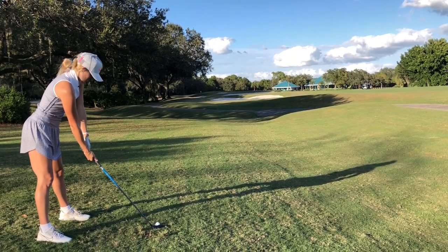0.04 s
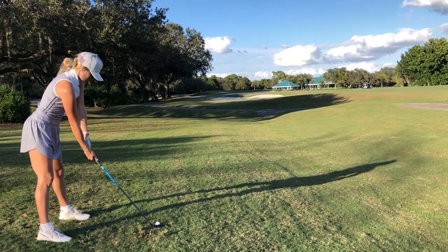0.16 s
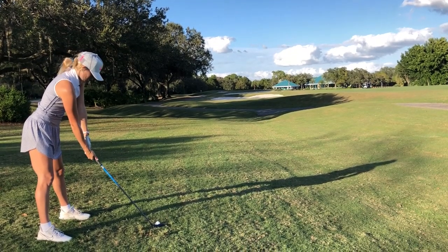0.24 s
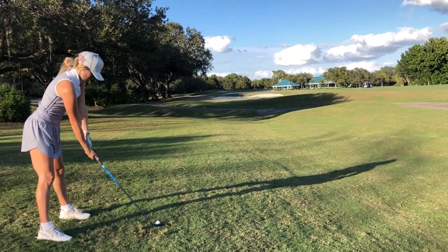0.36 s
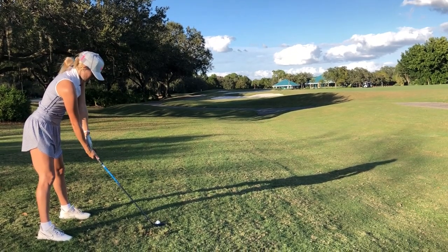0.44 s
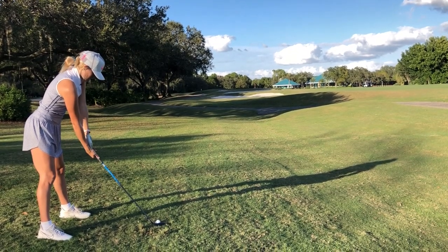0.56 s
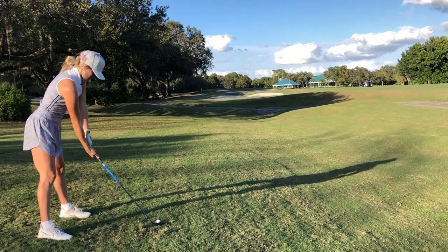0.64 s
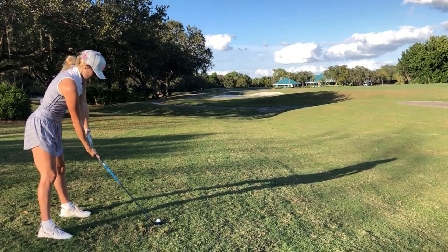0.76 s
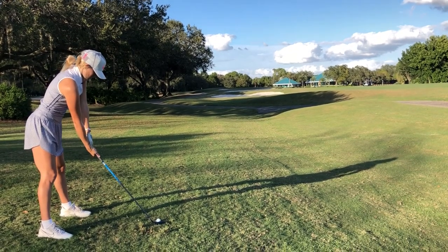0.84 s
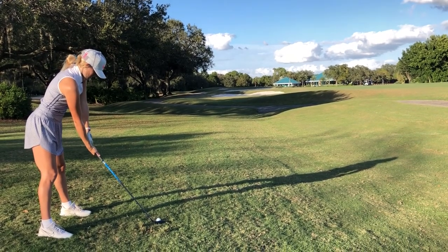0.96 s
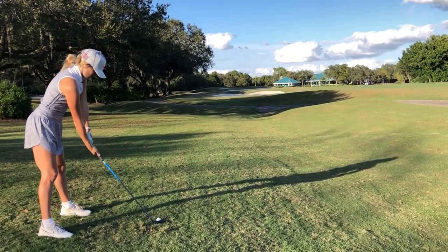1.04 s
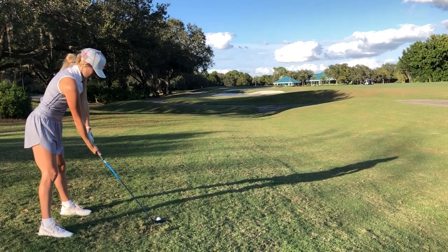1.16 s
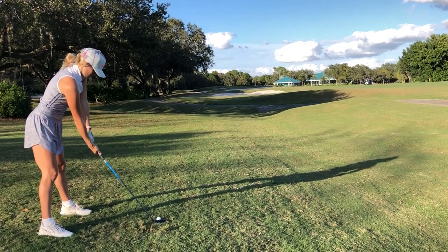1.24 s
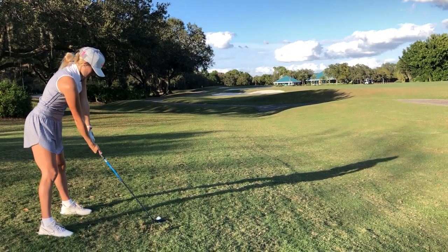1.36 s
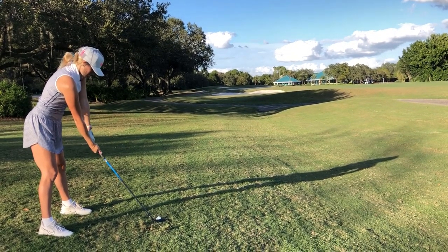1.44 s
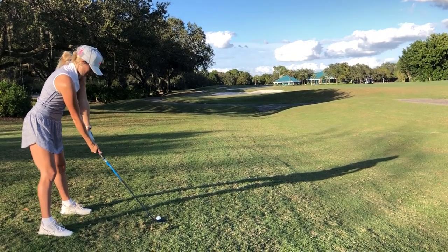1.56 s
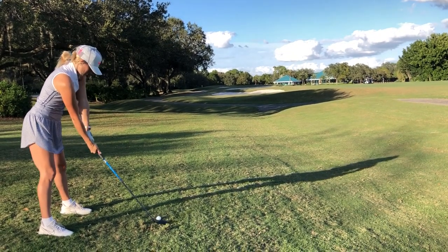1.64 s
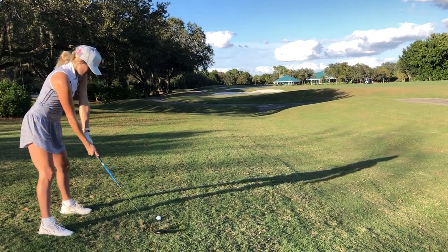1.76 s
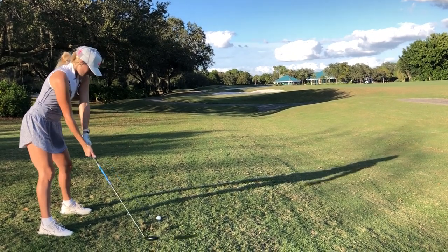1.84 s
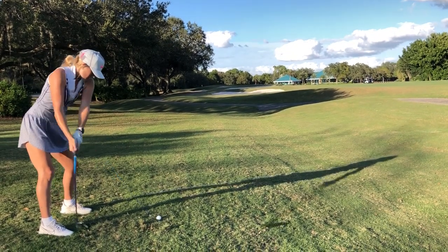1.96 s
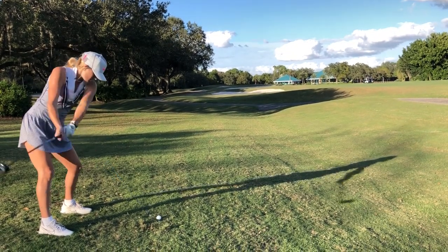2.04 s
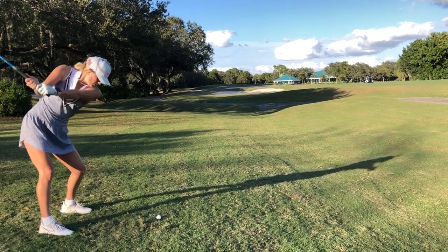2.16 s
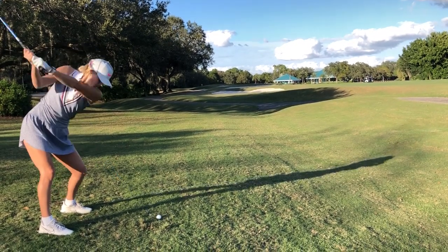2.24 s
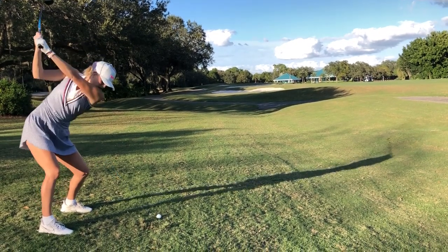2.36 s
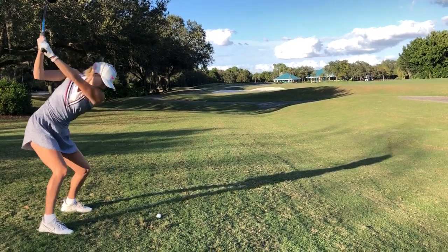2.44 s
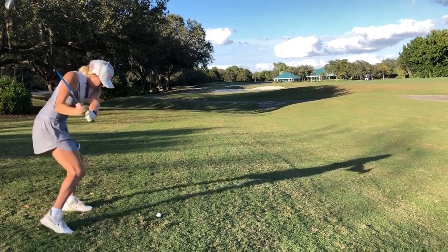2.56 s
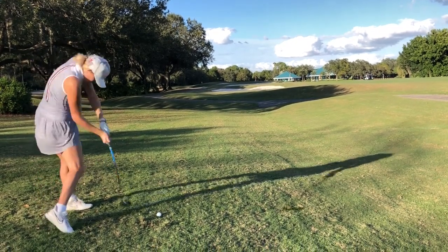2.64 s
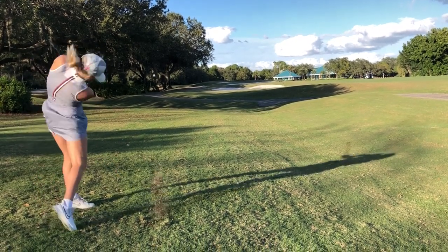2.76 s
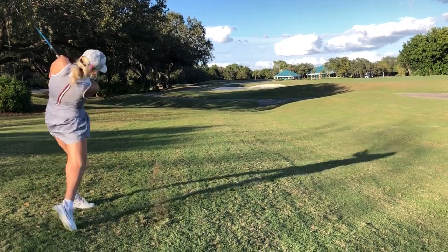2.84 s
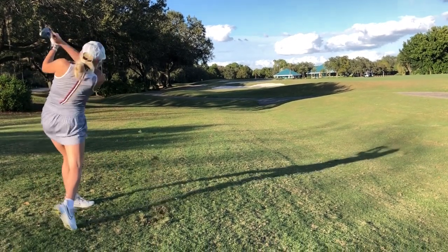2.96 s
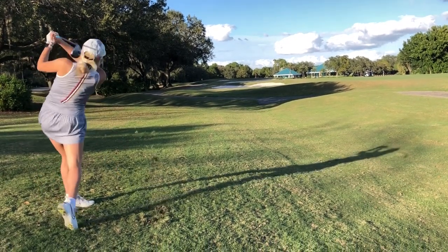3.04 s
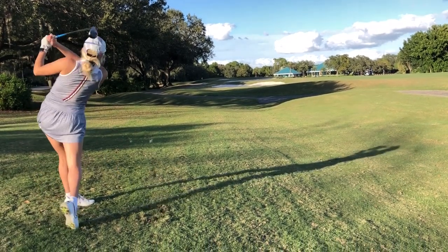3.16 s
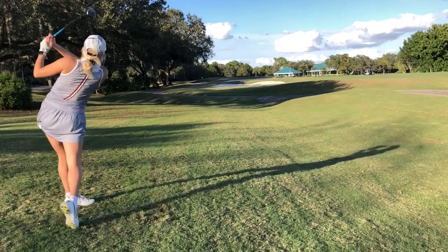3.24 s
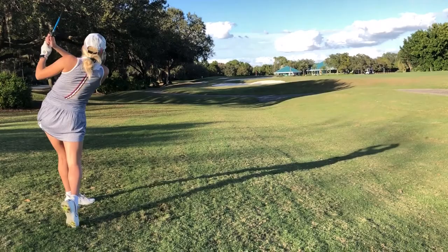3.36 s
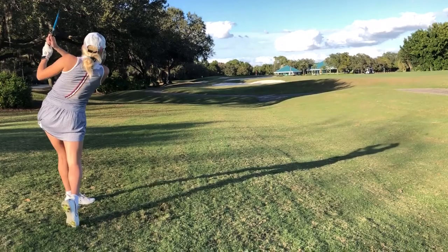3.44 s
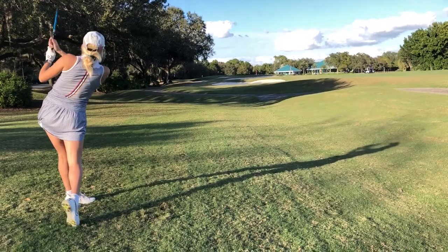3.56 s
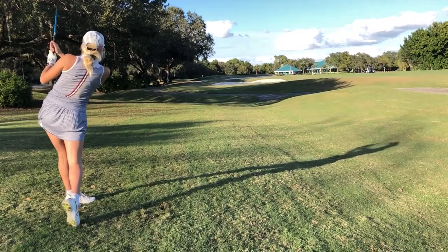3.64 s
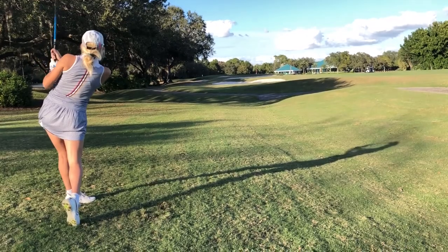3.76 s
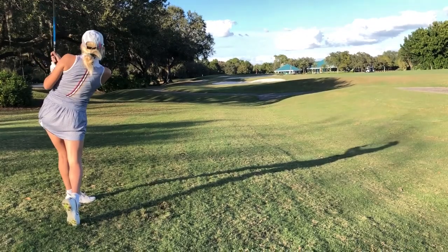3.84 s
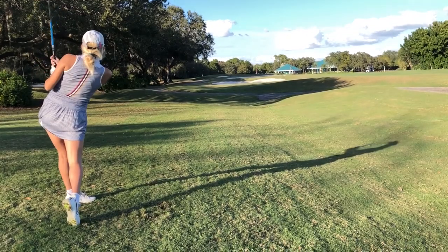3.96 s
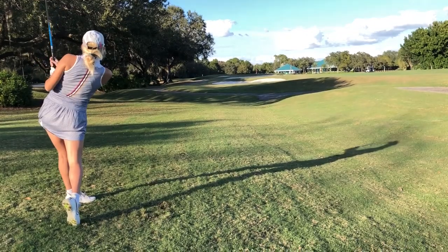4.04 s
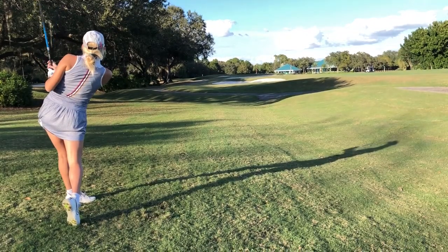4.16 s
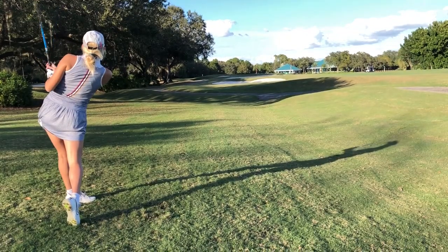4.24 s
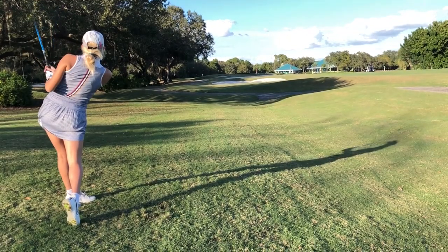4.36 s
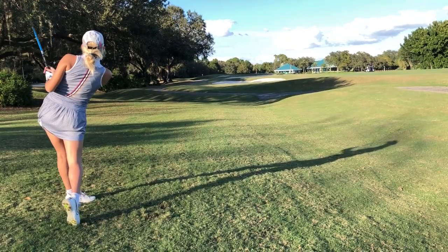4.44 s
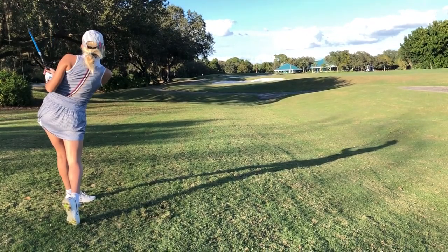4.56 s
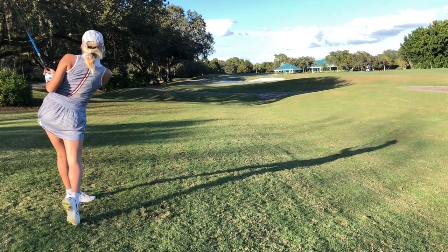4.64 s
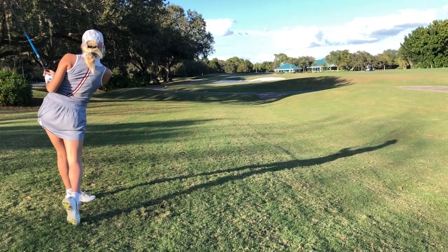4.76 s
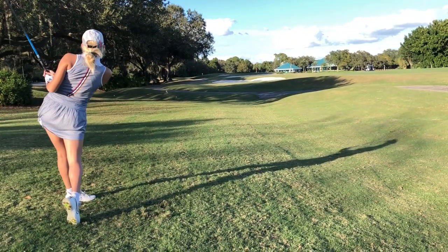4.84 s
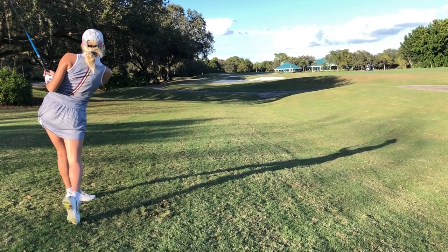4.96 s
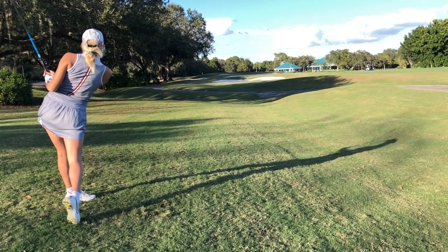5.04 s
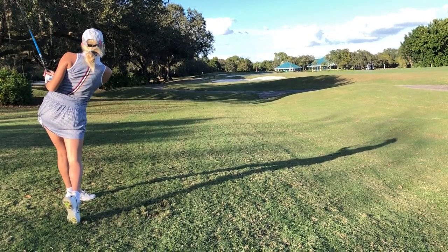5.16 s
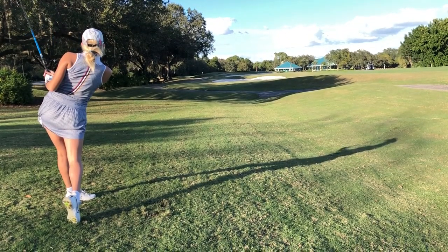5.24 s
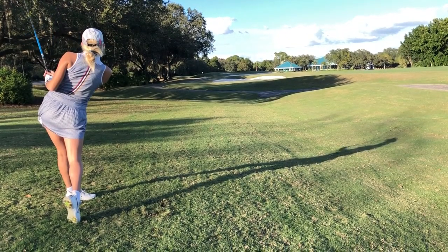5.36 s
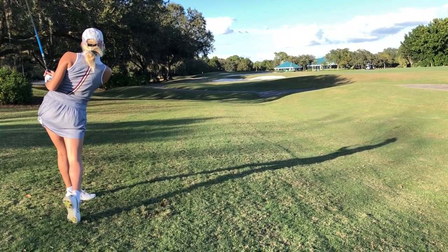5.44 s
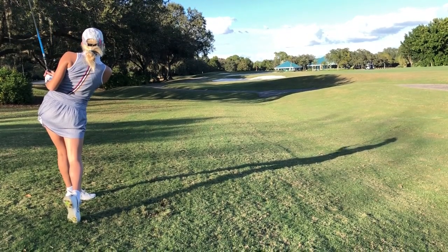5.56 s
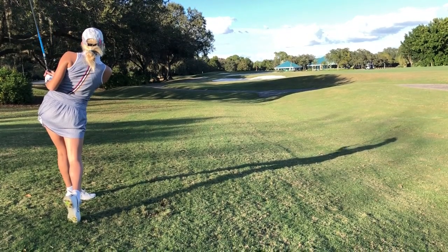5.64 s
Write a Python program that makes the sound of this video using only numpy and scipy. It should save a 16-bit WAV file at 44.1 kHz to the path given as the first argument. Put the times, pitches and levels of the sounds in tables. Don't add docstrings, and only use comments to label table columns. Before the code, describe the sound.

Faint outdoor hum and insects, a short swish into a hard clipped golf strike, followed by a loud dry crack and fainter distant ones.

```python
import sys
import numpy as np
from scipy import signal
from scipy.fft import rfft, irfft, next_fast_len
from scipy.io import wavfile
from scipy.ndimage import map_coordinates

SR = 44100
rng = np.random.default_rng(int(sys.argv[2]) if len(sys.argv) > 2 else 0)


def attenuation_scalar(level_db):
    decades = np.asarray(level_db, float) / 20
    return 10 ** decades


def file_out(sig):
    cols = np.atleast_2d(sig).T
    lim = np.clip(cols, -1, 1)
    pcm = np.round(lim * 32767).astype(np.int16)
    wavfile.write(sys.argv[1], SR, pcm)


N = 251805
T = np.arange(N) / SR

# pitch_hz, width_hz, level_db
CICADAS = [(9000, 130, -82), (5420, 520, -77)]
# pitch_hz, level_db
WHINE = (9980, -83)
# pitch_hz, level_db
TRAFFIC_COLOUR = [(15, -70), (25, -36.5), (42, -14.5), (63, -6), (123, -2), (316, -19.5), (352, -18.5),
                  (425, -20.5), (541, -19), (1150, -21), (1680, -33), (4440, -43.5), (5810, -46.5),
                  (6300, -47), (15800, -52)]
TRAFFIC_DB = -43.5

# pitch_hz, level_db, first_chirp_s, period_s, swell_db
CRICKETS = [(5930, -74, .22, .385, 7), (5595, -69, .165, .472, 0.4), (5350, -73, .185, .467, -1.5)]
STROKE_S, PAIR_S = .014, .064
SWELL_S, LOUDEST_S = 5.2, .2

# start_s, attack_s, hold_s, die_away_s, level_db
CHIP = (.8535, .007, .0055, .007, -45)
# start_s, attack_s, hold_s, die_away_s, level_db
CHIP_ECHO = (.864, .004, .003, .07, -59)
ARCH_HZ, ARCH_DROP_HZ, ARCH_TOP_S, ARCH_HALF_S = 5600, 1300, .8628, .0065

# start_s, attack_s, hold_s, die_away_s, level_db
GRASS_STROKES = [
    (1.52, .13, .16, .12, -58.5),
    (2.41, .05, .2, .05, -65),
]
# pitch_hz, level_db
BLADE_COLOUR = [(1760, -35), (3000, -7), (4070, -10), (5530, -4), (7770, -2), (10000, -5), (13500, -2),
                (15800, 4)]

# start_s, peak_db, pitch_hz
TICKS = [(1.908, -50, 5300), (2.15, -58, 5500), (2.34, -56, 4400), (2.398, -51, 5500), (2.559, -49, 6800),
         (2.62, -47, 4500), (3.028, -55, 9000), (3.059, -55, 14500), (3.071, -48, 8000), (3.079, -48, 7200),
         (3.094, -50, 7000), (3.248, -33, 4500), (3.255, -42, 13000), (3.366, -48, 11600),
         (3.56, -60, 11500), (3.63, -60, 8500), (3.868, -55, 12000), (3.929, -43, 4300), (3.93, -52, 8000),
         (3.927, -54, 12500), (3.941, -46, 4300), (3.942, -53, 11500), (3.978, -58, 12600),
         (4.023, -57, 12000), (4.43, -55.5, 5540), (5.037, -54, 9000), (5.042, -53, 9000),
         (5.05, -56.5, 11000), (5.129, -56, 8500)]

# time_s, shedding_hz, level_db
SWISH = [(2.6, 130.5, -63), (2.636, 331, -46), (2.654, 480, -35.5), (2.68, 450, -33), (2.705, 430, -30),
         (2.72, 400, -31.5), (2.738, 170, -32), (2.78, 99, -46), (2.8, 88.2, -56)]
# start_s, attack_s, hold_s, die_away_s, level_db
GUSTS = [
    (2.41, .06, .2, .1, -62.5),
    (2.72, .015, .005, .19, -42),
]
# pitch_hz, level_db
WAKE_COLOUR = [(700, -22), (1500, -2), (2500, -10), (4000, -6), (7000, -7), (15800, -17)]
WAKE_DB, WAKE_GROWS = 27, 2.3

# start_s, attack_s, hold_s, die_away_s, level_db
SQUEAK = (2.423, .01, .235, .06, -60.5)
# pitch_hz, glide_share, level_db, life_s
SQUEAK_PARTIALS = [(2880, 0.55, -4, 0.3), (4560, 0.34, -1, 0.17), (6900, .5, -1, .13), (7500, .4, -5, .1),
                   (10200, .3, -12, .09), (11600, .3, -11, .07)]
SETTLE_HZ, SAG_HZ, SAG_S = 5500, 800, .042
BITE, BITE_S = .2, .0055
SLIP_S, SLIP_WIDE_S, SLIP_DB = 2.505, .016, -9

# start_s, grit_db, face_hz, face_db, contact_s
CONTACTS = [(2.697, -32, 5800, -34, .002), (2.7112, -30.5, 7900, -29.5, .001),
            (2.7140, -15, 6000, -12.5, 0.0038), (2.7167, -12, 7600, -9.5, 0.0015),
            (2.72037, -8, 5900, 9, 0.00108), (2.7236, -15, 8300, -11, 0.0018),
            (2.7314, -21.5, 8370, -19, .003), (2.736, -27, 8370, -23, .002), (2.741, -31, 8370, -26, .003)]
# pitch_hz, level_db
GRIT_COLOUR = [(400, -20.5), (1400, -4.5), (3000, -10.5), (4600, -3.5), (6000, -8), (8300, 1.5), (9200, -7),
               (10300, -4.5), (12500, -2), (15800, -13.5)]
# pitch_hz, level_db, die_away_s
RING = [(8370, -30, 0.11), (5800, -30, .06), (4600, -17, .045)]
# start_s, level_db, pitch_hz
THUDS = [(2.7158, -7.5, 1300), (2.7188, -6, 650), (2.7215, -10, 900), (2.7325, -20, 300), (2.737, -19, 220)]
GRIT_DIE_S, DIG_DIE_PER_S = .016, .4

# start_s, attack_s, hold_s, die_away_s, level_db
LEAF_ECHO = [(2.791, .006, .018, .17, -33.5)]
# start_s, attack_s, hold_s, die_away_s, level_db
CROWN_ECHO = [
    (2.792, .008, .048, .07, -41),
    (2.8, .05, .15, 1.5, -50.5),
]
# pitch_hz, level_db
LEAF_COLOUR = [(530, -44.5), (900, -14), (1130, -15), (1400, -4.5), (2060, -13.5), (2980, -6), (3790, -11),
               (4930, 0.5), (5630, -10.5), (6740, 0.5), (8980, -14.5), (10700, -8.5), (15800, -23.5)]
# pitch_hz, width_hz, level_db
CROWN_BANDS = [(2750, 560, -9), (4920, 300, 0), (6300, 310, 0)]

# start_s, attack_s, hold_s, die_away_s,
# level_db
RUSTLE = [(2.8, .04, .02, .9, -53), (3.15, .03, .09, .8, -49.5), (4.505, .02, .04, .6, -60),
          (4.646, .004, .02, .3, -61)]
# pitch_hz, level_db
FOLIAGE_COLOUR = [(900, -20), (1500, -2), (2500, -4), (5700, -6), (9400, -13), (11500, -11), (15800, -16)]

# start_s, peak_db, pitch_ratio, splinter_db, scatter_db
NEAR_CRACKS = [(3.1053, -35.5, 3.7, 14, -11.5), (3.133, -18, 1.04, -6, -13.5),
               (3.14678, -2, 1.06, -15, -24.5), (3.14797, -11, 1.06, -7, -29.5),
               (3.1522, -17, 1.2, -11.5, -16), (3.19, -30, 0.98, 0, -14), (3.2122, -22, 1.08, -6, -16)]
# start_s, peak_db, pitch_ratio
FAR_CRACKS = [(4.502, -33, 1.06), (4.505, -28, 1.15), (4.5164, -24.5, 1.15), (4.571, -40, 1.15),
              (4.6455, -30.5, 1.62)]
FAR_SPLINTER_DB, FAR_SCATTER_DB = -14, -13.5
NEAR_KHZ, FAR_KHZ = 32, 6.5
# pitch_hz, width_hz, level_db
WOOD_MODES = [(1300, 360, -23), (3175, 290, 4), (3760, 400, -3.5), (4640, 500, -4), (7800, 900, -12)]
# pitch_hz, level_db
SPLINTER_COLOUR = [(150, -14), (600, -6.5), (1500, -6.5), (4000, -5), (8000, -5), (9800, -9), (12000, -2.5),
                   (15800, -12)]

# start_s, attack_s, hold_s, die_away_s, level_db
GROVE_ECHO = [(3.148, .008, .02, .4, -40), (3.27, .08, .01, .3, -50), (3.39, .04, .02, .5, -57),
              (3.6, .04, .01, .3, -66), (4.51, .015, .02, .45, -53)]
# pitch_hz, width_hz, level_db
HOLLOW_BANDS = [(4050, 600, 0), (3223, 460, -6.5), (5237, 1500, -7)]


def unit(x):
    return x / np.sqrt(np.mean(x ** 2) + 1e-20)


def curves(rows):
    s, *columns = np.transpose(rows)
    gate = (T > s[0]) & (T < s[-1])
    return [np.interp(T, s, column) for column in columns] + [gate]


def filtered(x, response):
    size = next_fast_len(len(x) + 8192)
    spectrum = rfft(x, size) * response(np.fft.rfftfreq(size, 1 / SR))
    return irfft(spectrum, size)[:len(x)]


def colour(points):
    f, db = np.transpose(points)
    return lambda hz: attenuation_scalar(np.interp(np.log(hz + 1), np.log(f + 1), db))


def modes(peaks, base_db=-120):
    def response(f):
        total = 0
        for k, (centre, width, db) in enumerate(peaks):
            resonance = 1j * f * width / (centre * centre - f * f + 1j * f * width)
            total = total + (-1) ** k * attenuation_scalar(db) * resonance
        return attenuation_scalar(base_db) + total
    return response


def noise(response, size=N):
    return unit(filtered(rng.standard_normal(size), response))


def wobble(rate):
    knots = rng.standard_normal(int(N * rate / SR) + 4)
    return map_coordinates(knots, [T * rate])


def add(track, s, x):
    track[round(s * SR):][:len(x)] += x


def fade(t60, size):
    return attenuation_scalar(-60 * np.arange(size) / SR / t60)


def swell(s, attack, hold, t60, db):
    rise = np.clip((T - s) / attack, 0, 1) ** 2
    return rise * attenuation_scalar(db - 60 * np.clip(T - s - attack - hold, 0, None) / t60)


def swells(rows):
    return sum(swell(*row) for row in rows)


def cicadas():
    return sum(attenuation_scalar(db + 1.5 * wobble(4)) * noise(modes([(hz, width, 0)])) for hz, width, db in CICADAS)


def whine():
    hz, db = WHINE
    return attenuation_scalar(db + 3) * np.sin(2 * np.pi * hz * T)


def traffic():
    return attenuation_scalar(TRAFFIC_DB + 0.3953 * wobble(7.3)) * noise(colour(TRAFFIC_COLOUR))


def crickets():
    out = np.zeros(N)
    for hz, db, first, period, swell_db in CRICKETS:
        since = (T - first + period / 2) % period - period / 2
        pairs = np.exp(-(since / STROKE_S) ** 2) + np.exp(-((since - PAIR_S) / STROKE_S) ** 2)
        song_db = swell_db * np.cos(2 * np.pi * (T - LOUDEST_S) / SWELL_S)
        level_db = db + song_db + 1.8 * wobble(4.96) + 2.5 * wobble(120)
        phase = 2 * np.pi * np.cumsum(hz + 25 * wobble(37)) / SR
        out += attenuation_scalar(level_db) * pairs * np.sin(phase)
    return out


def bird():
    hz = ARCH_HZ - ARCH_DROP_HZ * np.clip((T - ARCH_TOP_S) / ARCH_HALF_S, -2, 2) ** 2
    chip = swell(*CHIP) * np.sin(2 * np.pi * np.cumsum(hz) / SR)
    return chip + swell(*CHIP_ECHO) * noise(modes([(5250, 500, 0)]))


def grass():
    return sum(swell(*row) * attenuation_scalar(1.2 * wobble(120)) * noise(colour(BLADE_COLOUR)) for row in GRASS_STROKES)


def ticks():
    out = np.zeros(N)
    for s, db, hz in TICKS:
        click = noise(lambda f: modes([(hz, .4 * hz, 0)])(f) ** 2, size=2000)
        add(out, s, attenuation_scalar(db - 3.5) * fade(0.015, 2000) * click)
    return out


def swish():
    hz, db, gate = curves(SWISH)
    air_gain = gate * attenuation_scalar(WAKE_GROWS * db + WAKE_DB) + swells(GUSTS)
    air = air_gain * attenuation_scalar(1.5 * wobble(150)) * noise(colour(WAKE_COLOUR))
    phase = 2 * np.pi * np.cumsum(hz) / SR
    # pitch_ratio, level_db, wobble_hz
    parts = [(.62, -9, 200), (1, 0, 240), (1.5, -6, 401.5), (2.2, -9.5, 598.3), (3.3, -14, 1203)]
    shed = sum(attenuation_scalar(level) * wobble(rate) * np.sin(ratio * phase) for ratio, level, rate in parts)
    return air + gate * attenuation_scalar(db + 2.5) * shed


def squeak():
    age = np.clip(T - SQUEAK[0], 0, None)
    hz = SETTLE_HZ + SAG_HZ * np.exp(-age / SAG_S)
    bite = 1 - BITE * np.exp(-age / BITE_S)

    def tone(f):
        return np.sin(2 * np.pi * np.cumsum(f * bite + 20 * wobble(150)) / SR)

    overtones = np.zeros(N)
    for centre, glide, level, life in SQUEAK_PARTIALS:
        gain = attenuation_scalar(-3 + level + 1.9 * wobble(60)) * np.exp(-(age / life) ** 4)
        overtones += gain * tone(centre * (hz / 5800) ** glide)
    slip_db = SLIP_DB * np.exp(-((T - SLIP_S) / SLIP_WIDE_S) ** 2)
    main = attenuation_scalar(slip_db + 1.4 * wobble(80)) * tone(hz)
    return swell(*SQUEAK) * (main + overtones)


def strike():
    out = np.zeros(N)
    t = np.arange(4410) / SR
    for s, db, hz, mode_db, contact in CONTACTS:
        t60 = GRIT_DIE_S + DIG_DIE_PER_S * (s - CONTACTS[0][0])
        grit = attenuation_scalar(db) * fade(t60, len(t)) * noise(colour(GRIT_COLOUR), size=len(t))
        ping = attenuation_scalar(mode_db) * np.exp(-(t / contact) ** 3) * np.sin(2 * np.pi * hz * t)
        add(out, s, (grit + ping) * (1 - np.exp(-t / 0.00018)))
    for s, db, hz in THUDS:
        thud = -attenuation_scalar(db) * np.sin(2 * np.pi * hz * t) * np.exp(-1.2 * hz * t)
        add(out, s - 0.23 / hz, thud)
    for hz, db, t60 in RING:
        gain = attenuation_scalar(db + 3 * wobble(250)[:len(t)]) * fade(t60, len(t))
        add(out, 2.7215, gain * np.sin(2 * np.pi * hz * t))
    return out


def oaks():
    near = swells(LEAF_ECHO) * attenuation_scalar(2.2 * wobble(150)) * noise(colour(LEAF_COLOUR))
    far = swells(CROWN_ECHO) * attenuation_scalar(1.7 * wobble(60)) * noise(modes(CROWN_BANDS, base_db=-24.5))
    return near + far


def rustle():
    return swells(RUSTLE) * attenuation_scalar(2.5 * wobble(70)) * noise(colour(FOLIAGE_COLOUR))


def cracks():
    out, size = np.zeros(N), SR // 3
    breaks = [(*row, NEAR_KHZ) for row in NEAR_CRACKS]
    breaks += [(*row, FAR_SPLINTER_DB, FAR_SCATTER_DB, FAR_KHZ) for row in FAR_CRACKS]
    splinters, hollow = colour(SPLINTER_COLOUR), modes(HOLLOW_BANDS)
    for s, db, ratio, splinter_db, scatter_db, khz in breaks:
        kick = filtered(-fade(0.00067, size), lambda f: modes(WOOD_MODES)(f / ratio))
        bright = fade(.01, size) * noise(splinters, size=size)
        scatter = fade(0.2, size) * noise(lambda f: splinters(f) + 1.2 * abs(hollow(f)), size=size)
        body = attenuation_scalar(-6) * fade(.08, size) * noise(modes([(600, 900, 0), (1497, 550, -1)]), size=size)
        crack = kick / abs(kick).max() + attenuation_scalar(splinter_db) * bright + attenuation_scalar(scatter_db) * (scatter + body)
        add(out, s, attenuation_scalar(db) * filtered(crack, lambda f: 1 / (1 + 1j * f / (1000 * khz)) ** 2))
    return out


def grove():
    gain = swells(GROVE_ECHO) * attenuation_scalar(1.5 * wobble(50))
    return gain * noise(lambda f: modes(HOLLOW_BANDS)(f) ** 2)


def scene():
    surroundings = cicadas() + whine() + traffic() + crickets() + bird()
    shot = squeak() + grass() + swish() + strike()
    trees = oaks() + rustle() + grove() + cracks() + ticks()
    return (surroundings + shot + trees)[None]


def low_pass(x):
    return signal.sosfilt(signal.butter(12, 15920, fs=SR, output="sos"), x)


def record(dry):
    saturated = np.clip(dry[0], -1.15, 1.15)
    kept = filtered(saturated, lambda hz: hz < 15900)[None]
    return low_pass(np.clip(kept, -1, 1))


dry = scene()
out = record(dry)
file_out(out)
```